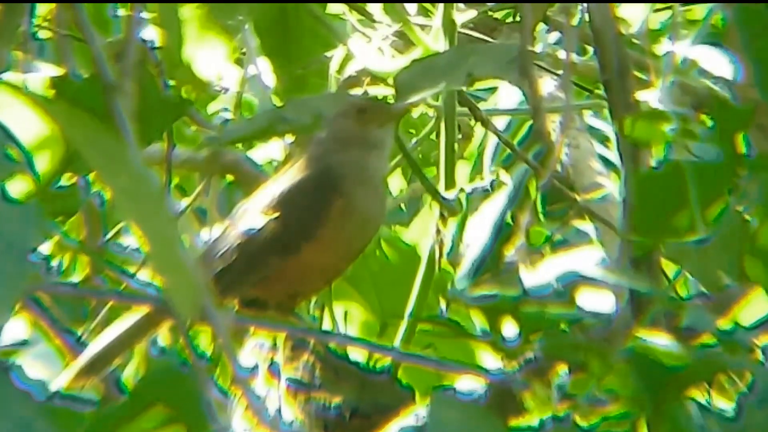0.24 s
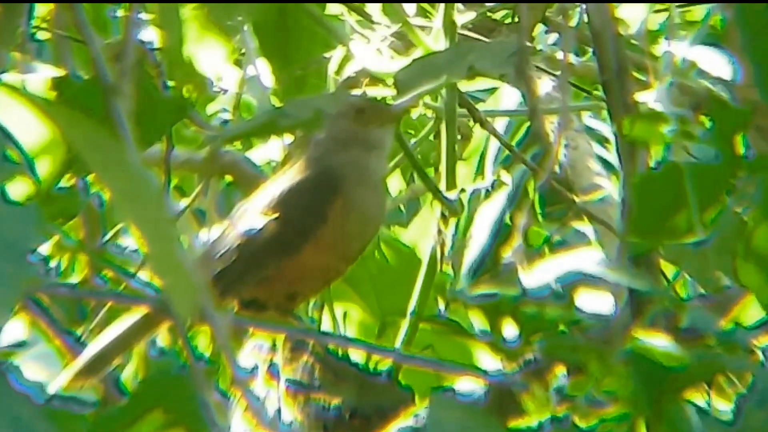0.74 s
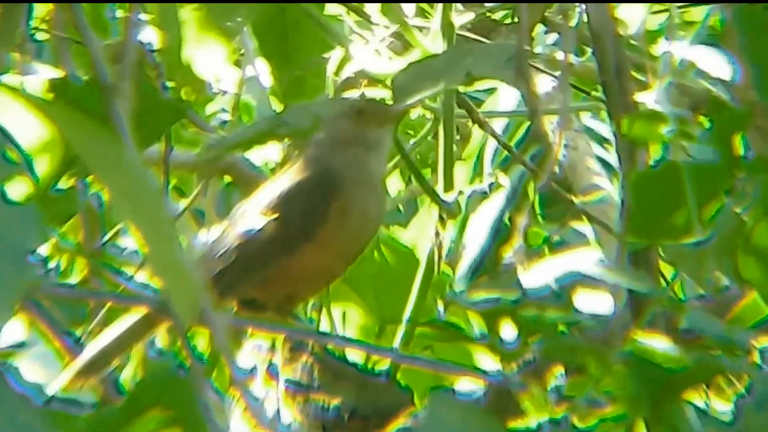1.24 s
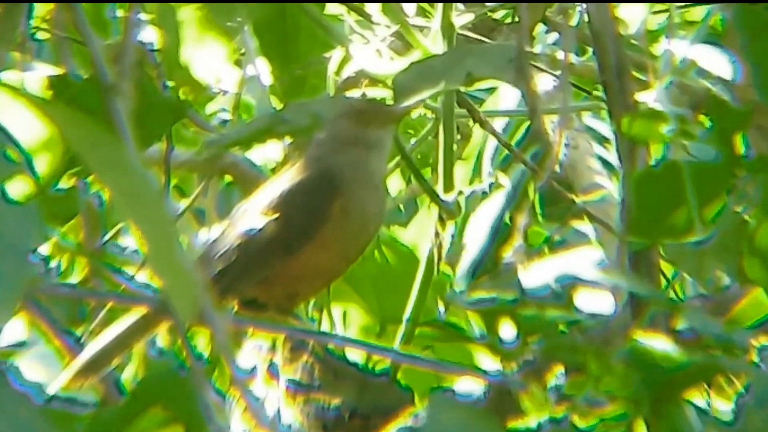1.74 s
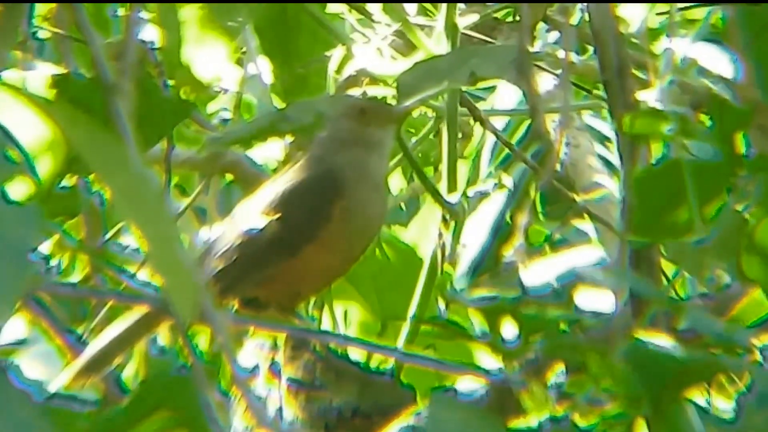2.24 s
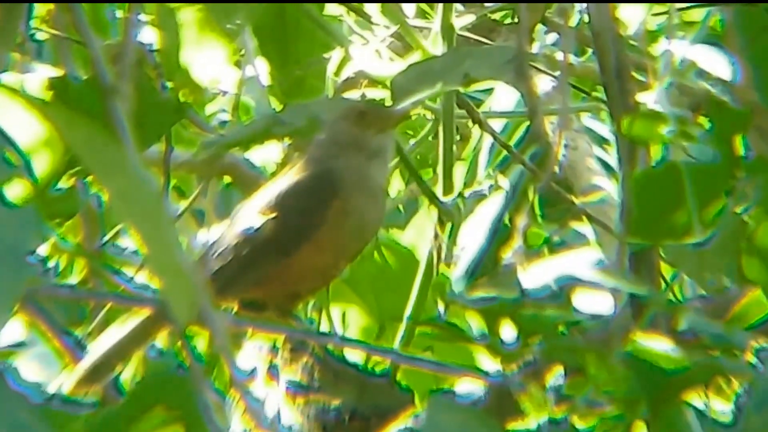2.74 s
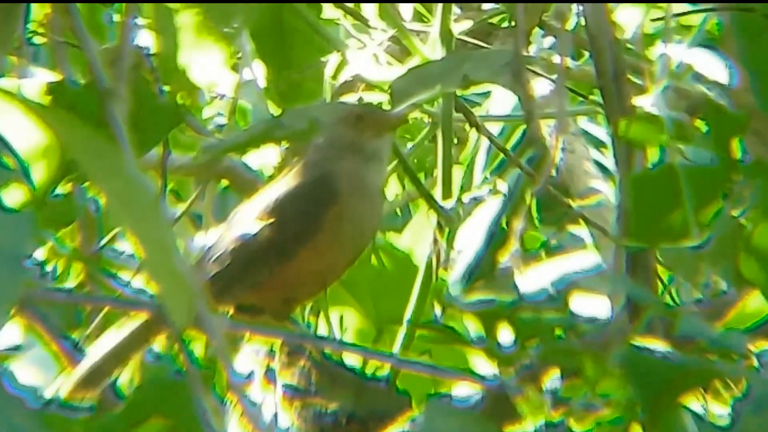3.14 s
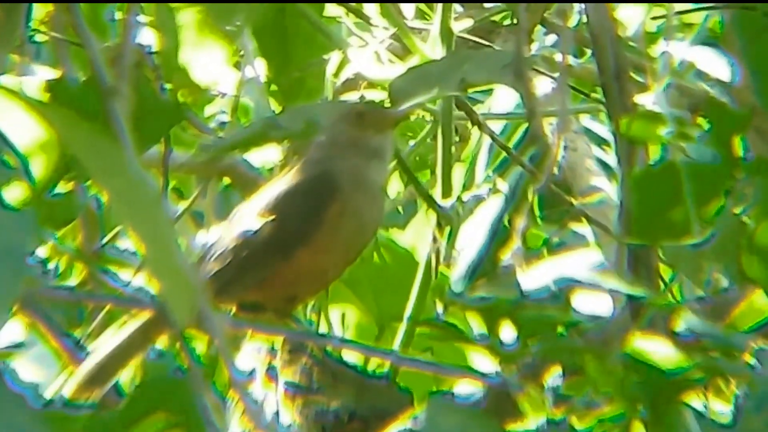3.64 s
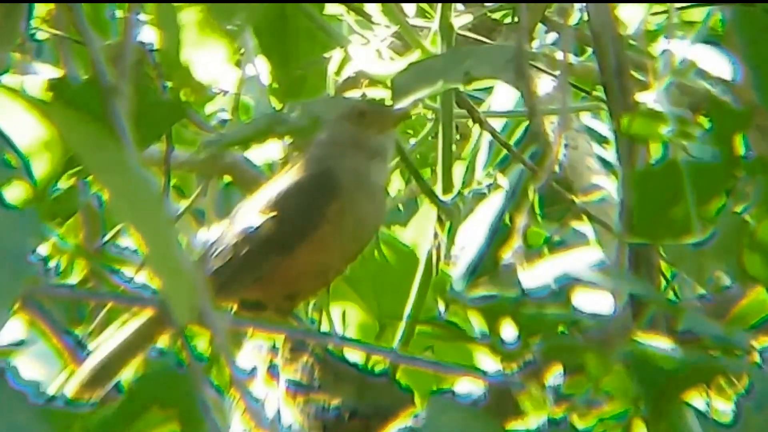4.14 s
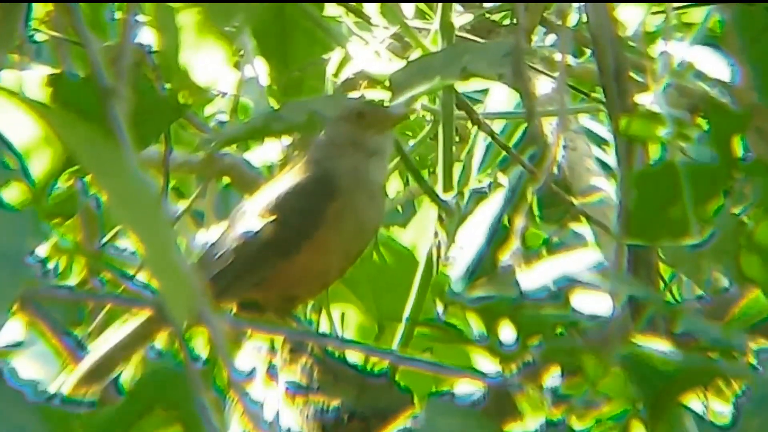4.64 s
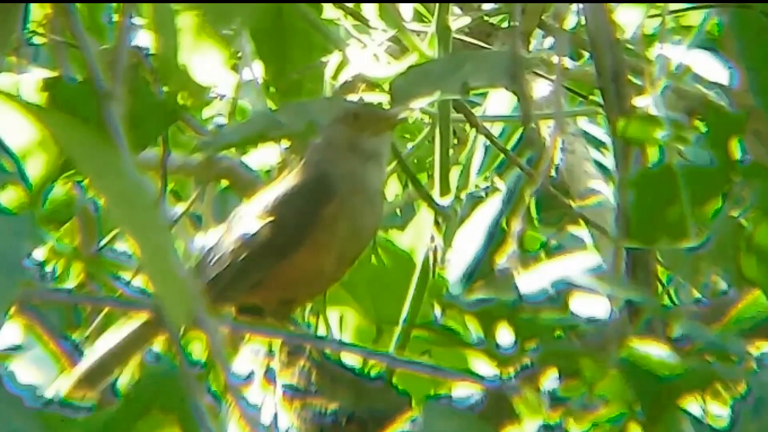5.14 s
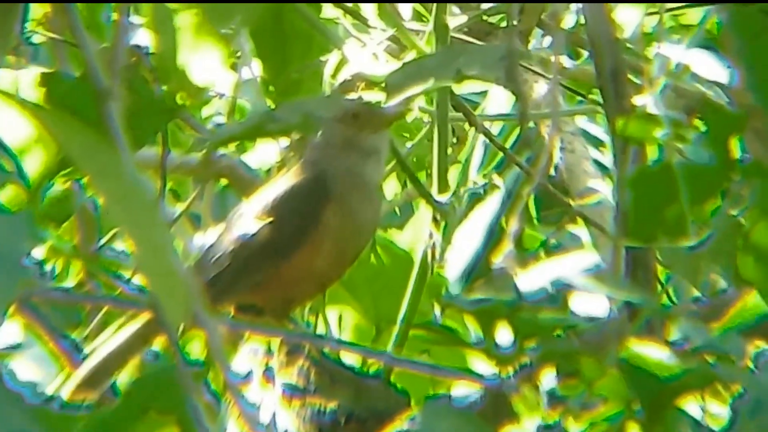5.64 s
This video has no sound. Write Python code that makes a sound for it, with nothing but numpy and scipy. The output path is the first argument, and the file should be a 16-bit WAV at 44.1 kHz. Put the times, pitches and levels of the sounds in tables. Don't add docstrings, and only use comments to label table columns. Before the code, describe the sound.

A thrush whistles two short rich phrases among leafy trees, with faint small birds, sharp twig ticks, soft breeze and low wind rumble near the end.

```python
import sys
import numpy as np
from scipy import signal
from scipy.fft import rfft, irfft, next_fast_len
from scipy.io import wavfile
from scipy.ndimage import uniform_filter1d

SR = 44100
rng = np.random.default_rng(int(sys.argv[2]) if len(sys.argv) > 2 else 0)


def convert_level_to_amplitude(level_db):
    exponent = np.asarray(level_db, float) / 20
    return 10 ** exponent


def generate_wav(sig):
    pcm = np.round(np.clip(np.atleast_2d(sig).T, -1, 1) * 32767).astype(np.int16)
    wavfile.write(sys.argv[1], SR, pcm)


N = 259294


def level(x, db):
    return x * convert_level_to_amplitude(db) / np.sqrt(np.mean(x ** 2))


def curve(rows):
    return np.interp(np.arange(N) / SR, *np.transpose(rows))


def coloured(spectrum, size=N):
    hz, db = np.transpose(spectrum)
    f = np.fft.rfftfreq(size, 1 / SR) + 1
    gain = convert_level_to_amplitude(np.interp(np.log(f), np.log(hz), db, left=-80))
    return level(irfft(rfft(rng.standard_normal(size)) * gain, size), 0)


def add(out, start_s, sound):
    i = int(start_s * SR)
    out[i:i + len(sound)] += sound[:len(out) - i]


def walk(rate_hz):
    k = int(SR / rate_hz)
    held = np.repeat(rng.standard_normal(N // k + 1), k)
    return 1.3 * uniform_filter1d(uniform_filter1d(held, k), k)[:N]


def glide(u, from_hz, to_hz, ease):
    return from_hz + (to_hz - from_hz) * (1 - np.exp(-ease * u)) / (1 - np.exp(-ease))


def swoop(u, from_hz, to_hz, hold):
    return from_hz + (to_hz - from_hz) * (1 - np.cos(np.pi * u ** hold)) / 2


def arch(u, peak, start_db, end_db):
    return np.interp(u, [0, peak, 1], [start_db, 0, end_db])


def course(u, start_s, length_s, hz, db):
    return np.c_[start_s + length_s * u, hz, db]


U = np.linspace(0, 1, 61)

# share of length, pitch over lowest, effort in dB.
SCOOP_SHAPE = [(0, 1.8, -28.5), (.03, 1.37, -10.5), (.15, 1.2, -7), (.31, 1.03, -3), (.43, 1.0, -15.5),
               (.56, 1.04, -1), (.73, 1.08, -2.5), (0.958, 1.19, -1), (1, 1.162, -21)]
# share of length, pitch over top, effort in dB.
HOOK_SHAPE = [(0, .83, -11), (.14, .94, -11), (.28, 0.98, -3), (.85, .975, -2), (1, 0.893, -18)]
# share of length, pitch over shelf, effort in dB.
SLIDE_SHAPE = [(0, 1.31, -44), (.11, 1.13, -4), (.21, 1.01, -9.5), (0.331, .995, -1), (0.571, .955, 1),
               (.92, .9, -3.5), (1, 0.78, -36.5)]
# start in s, length in s, pitch in Hz, level in dB, reach of second half (1 = as shape).
SCOOPS = [(2.756, .375, 1793, -24.5, 1.2), (4.91, .36, 1790, -24.5, .85)]
HOOKS = [(2.49, 0.13, 2430, -28, 1.274), (4.627, 0.1228, 2390, -23, 0.77)]
SLIDES = [(3.268, .247, 2489, -25, 1.01)]


def shaped_notes():
    notes, second_half_at = [], 0.43
    stock = (("scoop", SCOOP_SHAPE, SCOOPS), ("hook", HOOK_SHAPE, HOOKS), ("slide", SLIDE_SHAPE, SLIDES))
    for kind, shape, rows in stock:
        share, ratio, effort_db = np.transpose(shape)
        for s, length, hz, db, reach in rows:
            pitch = hz * np.interp(U, share, ratio) ** np.where(U > second_half_at, reach, 1)
            notes.append((kind, course(U, s, length, pitch, db + np.interp(U, share, effort_db))))
    return notes


# start in s, length in s, from Hz, to Hz, level in dB.
HELD = [(3.725, 0.1016, 1590, 1733, -27.5), (3.837, 0.106, 1917, 1821, -27), (4.149, .2, 1728, 1965, -25.5),
        (5.603, 0.09, 1913, 1799, -29.5)]


def held_notes():
    notes, attack_s, release_s = [], 0.0068, 0.006
    for s, length, a, b, db in HELD:
        corners_s = [0, attack_s, length - release_s, length]
        effort_db = np.interp(U * length, corners_s, [-50, -8.5, 0, -19])
        notes.append(("held", course(U, s, length, glide(U, a, b, ease=2.43), db + effort_db)))
    return notes


# start in s, length in s, from Hz, to Hz, level in dB.
CHIPS = [(2.688, 0.07, 2505, 2700, -52), (5.681, 0.051, 1903, 2274, -27.5)]
# start in s, length in s, from Hz, to Hz, level in dB.
GRACES = [(2.451, .032, 2500, 2273, -45), (4.593, .03, 2930, 1940, -35.5)]


def chips_and_graces():
    notes = []
    for s, length, a, b, db in CHIPS:
        notes.append(("chip", course(U, s, length, glide(U, a, b, ease=4.86), db + arch(U, .2, -11, -22.5))))
    for s, length, a, b, db in GRACES:
        hz = swoop(U, a, b, hold=1.086)
        notes.append(("chip", course(U, s, length, hz, db + arch(U, 0.465, -16.5, -23))))
    return notes


FLICK_SHAPE = [(0, 0.03), (.2, 0.31), (.38, 1), (.62, .55), (.76, .33), (.9, 0.033), (1, 0.024)]
# start in s, length in s, foot in Hz, top in Hz, level in dB.
FLICKS = [(3.823, .026, 1780, 2987, -40.5), (4.344, .062, 1990, 4060, -30)]


def flicks():
    notes, knee_hz, db_per_khz, end_db = [], 2720, -20.5, -14
    for s, length, foot, top, db in FLICKS:
        hz = foot + (top - foot) * np.interp(U, *np.transpose(FLICK_SHAPE))
        thinning_db = db_per_khz * np.maximum(hz - knee_hz, 0) / 1000
        notes.append(("flick", course(U, s, length, hz, db + thinning_db + end_db * U ** 10)))
    return notes


# start in s, length in s, centre in Hz, swing in Hz, level in dB.
WARBLES = [(5.529, 0.1018, 2660, 181.3, -33)]


def warbles():
    notes, rate_hz, high_db = [], 29.29, -10.5
    for s, length, hz, swing, db in WARBLES:
        turn = np.cos(2 * np.pi * rate_hz * (length * U - .01))
        effort_db = high_db * (1 + turn) / 2 + arch(U, 0.642, -3, -41)
        notes.append(("warble", course(U, s, length, hz + swing * turn, db + effort_db)))
    return notes


# time in s, pitch in Hz, level in dB.
LEFTOVER = [(0, 2120, -33.5), (.03, 2156, -59), (.1, 2150, -66), (.2, 2200, -72)]
MANNER = {"scoop": (10.4, -2.3), "hook": (5.7, -1), "slide": (11.7, -2), "held": (43, -13.5),
          "chip": (75, -22.5), "leftover": (92.6, -20), "flick": (69, -19), "warble": (40.2, -15)}


def song():
    notes = [("leftover", LEFTOVER)] + shaped_notes() + held_notes() + chips_and_graces() + flicks() + warbles()
    return [note for _, note in notes], [MANNER[kind] for kind, _ in notes]


# multiple of the whistle, level under it in dB.
OVERTONES = [(2, -32), (3, -45), (5, -37), (6, -41), (7, -49)]


def whistle(notes, manner, wobble):
    trill_hz, air_db = 76, -30
    out, tremor = np.zeros(N), 1 + wobble * walk(120)
    air = 1 + convert_level_to_amplitude(air_db) * coloured([(20, -28), (300, 12.5), (450, -19.0)])
    flutter = 2 * np.pi * np.cumsum(trill_hz * (1 + .15 * walk(40))) / SR
    for note, (depth_hz, bright_db) in zip(notes, manner):
        s, hz, db = np.transpose(note)
        t = np.arange(s[0], min(s[-1], (N - 1) / SR), 1 / SR)
        span = slice(int(s[0] * SR), int(s[0] * SR) + len(t))
        smooth = max(min(len(t) // 8, 90), 1)
        db = uniform_filter1d(np.interp(t, s, db), smooth)
        hz = uniform_filter1d(np.interp(t, s, hz), smooth) * tremor[span]
        phase = 2 * np.pi * np.cumsum(hz + depth_hz * np.sin(flutter[span])) / SR
        overtones = sum(convert_level_to_amplitude(d) * np.sin(int(k) * phase) for k, d in OVERTONES)
        throat_db = np.maximum(-8 * ((hz - 1980) / 260) ** 2, -14)
        tone = np.sin(phase) + convert_level_to_amplitude(bright_db + throat_db + .5 * (db + 30)) * overtones
        add(out, s[0], np.sqrt(2) * convert_level_to_amplitude(db) * tone * signal.windows.tukey(len(t), .04))
    return out * air


def scatter_tail(t, t60_s):
    return rng.standard_normal(len(t)) * convert_level_to_amplitude(-60 * t / t60_s) * np.sqrt(2 * np.log(1000) / t60_s / SR)


# delay in s, level in dB.
TRUNK_ECHOES = [(.019, -6.5), (.032, -19.5), (.05, -18.5)]


def among_trees(x, direct_db, leaves_db):
    t = np.arange(int(.9 * SR)) / SR
    leaves = convert_level_to_amplitude(leaves_db) * scatter_tail(t, t60_s=0.23) * np.minimum(t / 0.002, 1)
    path = leaves + convert_level_to_amplitude(-13.5) * scatter_tail(t, t60_s=0.57)
    path[0] += convert_level_to_amplitude(direct_db)
    for delay_s, db in TRUNK_ECHOES:
        path[int(delay_s * SR)] += convert_level_to_amplitude(direct_db + db)
    size = next_fast_len(N + len(t))
    gain = rfft(path, size)
    gain /= np.sqrt(uniform_filter1d(np.abs(gain) ** 2, size=600))
    return irfft(rfft(x, size) * gain, size)[:N]


# time in s, width in s, gain in dB.
FADES = [(2.572, .008, -4.5), (2.59, .006, 1.5), (2.921, 0.0125, -7), (2.965, .015, 6.5),
         (3.025, 0.0156, -5.5), (3.078, .007, -2), (3.092, 0.0027, 7.5), (3.115, 0.0065, 3),
         (3.371, 0.0059, -11.5), (3.495, 0.0028, 7.5), (3.755, 0.0066, 3.5), (3.815, 0.0092, -3.5),
         (3.923, 0.0057, -18), (3.938, 0.0072, 5), (4.05, 0.091, -3), (4.297, .004, 7.5),
         (4.39, 0.0047, 5.5), (4.68, 0.0046, -7), (4.719, 0.0089, -3.5), (4.83, 0.045, -6.5),
         (5.09, 0.0081, 10), (5.112, 0.0054, -16.5), (5.171, 0.00964, -13.5), (5.208, 0.0056, -16),
         (5.235, 0.007, -3), (5.265, 0.013, 8), (5.282, 0.0039, -15), (5.59, 0.0028, 4), (5.645, .01, -5.5),
         (5.68, 0.0057, 4.5)]


def faded(x):
    t = np.arange(N) / SR
    low = signal.sosfiltfilt(signal.butter(6, 3300, fs=SR, output="sos"), x)
    fade_db = sum(db * np.exp(-((t - s) / width) ** 2) for s, width, db in FADES)
    return x - low + low * convert_level_to_amplitude(fade_db)


def thrush():
    return faded(among_trees(whistle(*song(), wobble=0.0022), direct_db=0.5, leaves_db=2.5))


# start in s, length in s, from Hz, to Hz, level in dB.
FAR_RISES = [(0.276, .06, 4730, 5750, -68.5), (.94, 0.051, 4700, 5930, -68.5),
             (1.89, 0.178, 5034, 5980, -62.5), (2.245, .16, 4900, 5360, -64),
             (2.457, 0.27, 5180, 5300, -63.5), (2.679, 0.272, 3638, 4065, -62),
             (2.698, 0.16, 4817, 5210, -63), (2.811, 0.24, 4400, 4450, -68.5),
             (3.53, 0.169, 4800, 5150, -67), (3.92, 0.091, 2680, 4706, -61),
             (5.348, 0.059, 3328, 4200, -54), (4.797, .03, 2953, 3257, -60.5),
             (4.85, 0.056, 2570, 2630, -56)]
FAR_FALLS = [(0.753, .1, 3790, 3545, -55.5), (.8, 0.044, 4200, 4050, -68),
             (0.802, 0.028, 2620, 2530, -56.5), (1.66, .05, 4162, 3440, -55),
             (1.7, 0.029, 2640, 2473, -58.5), (1.862, .04, 5540, 4845, -60.5),
             (2.651, .05, 3950, 3700, -57.5), (2.839, 0.163, 5770, 5640, -81),
             (3.73, .03, 2150, 2050, -53.5), (4.461, .08, 5480, 4680, -65), (4.629, 0.082, 5580, 4560, -64),
             (4.745, .05, 8300, 4800, -60.5), (4.815, 0.0683, 3820, 3678, -56),
             (5.37, 0.14, 3200, 2700, -65.5), (5.732, 0.13, 5470, 5450, -61)]
FAR_DIVES = [(3.09, .38, 7400, 4590, -62), (4.235, .03, 7800, 6200, -59.5), (5.353, .045, 6776, 4660, -52),
             (5.779, .085, 6140, 3875, -55.5)]
# start in s, length in s, centre in Hz, swing in Hz, level in dB.
FAR_WARBLES = [(3.65, 0.3, 4068, 400, -70.5), (5.427, 0.054, 3900, 137.4, -54.5)]


def far_birds():
    u, calls = np.linspace(0, 1, 41), []
    rise_db, dive_db = arch(u, 0.39, -1.5, -8.5), arch(u, 0.55, -10.5, -0.5)
    effort_db = arch(u, 0.341, 5, -10)
    for rows, shape_db in ((FAR_RISES, rise_db), (FAR_FALLS, effort_db)):
        for s, length, a, b, db in rows:
            calls.append(course(u, s, length, glide(u, a, b, ease=2.0), db + shape_db))
    for s, length, hz, swing, db in FAR_WARBLES:
        pitch = hz + swing * np.cos(2 * np.pi * 21.62 * length * u)
        calls.append(course(u, s, length, pitch, db + effort_db))
    for s, length, a, b, db in FAR_DIVES:
        calls.append(course(u, s, length, swoop(u, a, b, hold=1.5), db + dive_db))
    voices = whistle(calls, [(80, -27)] * len(calls), wobble=.016)
    return among_trees(voices, direct_db=-25, leaves_db=-4)


# start in s, peak in dB, centre in Hz, rustle after it in dB.
TICKS = [(1.7965, -44.5, 6000, -14), (1.8621, -36, 5950, -15), (1.915, -34.5, 5970, -21),
         (5.159, -30, 5300, -20), (5.209, -17, 5530, -25.5), (5.2616, -25.5, 6130, -22),
         (5.6873, -22, 5420, -26)]
# start in s, length in s, level in dB.
RUSTLES = [(1.363, 0.052, -61), (1.821, 0.104, -63), (2.115, .006, -57), (2.124, 0.0069, -54),
           (2.137, 0.0089, -56), (2.159, .006, -55), (3.789, .01, -53.5), (3.798, 0.074, -58),
           (4.358, 0.086, -57.5)]


def twigs():
    out, t = np.zeros(N), np.arange(int(.2 * SR)) / SR
    tick_s = .0016
    for s, db, hz, rustle_db in TICKS:
        turn = 2 * np.pi * hz * (t - tick_s)
        tick = -(np.cos(turn) + 0.516 * np.sin(2 * turn)) * np.exp(-((t - tick_s) / .00008) ** 2)
        rustle = coloured([(2500, -4.5), (4500, 3), (7500, -2), (11000, -1.0), (16000, -13.5)], size=len(t))
        grains = convert_level_to_amplitude(2.2 * np.repeat(rng.standard_normal(len(t) // 60), 60)) * (t > .0018)
        add(out, s, convert_level_to_amplitude(db) * (0.943 * tick + convert_level_to_amplitude(rustle_db - 60 * t / 0.243) * grains * rustle))
    out = signal.sosfilt(signal.butter(2, 2800, "high", fs=SR, output="sos"), out)
    for s, length, db in RUSTLES:
        puff = coloured([(6000, -16.5), (9000, 7.5), (11000, 8), (14500, 1), (16000, -9)], size=len(t))
        add(out, s, convert_level_to_amplitude(db) * puff * np.minimum(t / 0.0025, 1) * np.exp(-(t / length) ** 2))
    return out


# frequency in Hz, level in dB per Hz.
LEAF_HISS = [(1500, -41.5), (4000, -9), (7500, -20.5), (10000, -1), (13000, 0.5), (16000, -8)]
# time in s, level in dB.
BREEZE = [(0.0, -65.5), (1.28, -64.5), (1.77, -67.5), (1.98, -63.5), (2.54, -64), (3.1, -61.5), (3.45, -63),
          (3.96, -60.5), (4.67, -62), (5.16, -60), (5.88, -61.5)]


def breeze():
    return coloured(LEAF_HISS) * convert_level_to_amplitude(2 * (curve(BREEZE) + 63) - 65.5 + .5 * walk(7.6))


# time in s, level in dB.
GUST = [(0, -77), (1.2, -56.5), (2.5, -64), (4.6, -87), (5.2, -59.5), (5.6, -58), (5.88, -78)]
# centre in s, frequency in Hz, peak in dB.
THUMPS = [(0.301, 121.1, -42), (5.726, 61.5, -41), (5.753, 49.6, -38.5), (5.84, 50, -46.5)]


def gusts():
    buffet = coloured([(12, -12), (22, -6), (45, 3), (65, 18.5), (100, -24)]) * convert_level_to_amplitude(curve(GUST) - 3.0)
    t = np.arange(-.05, .05, 1 / SR)
    for s, hz, db in THUMPS:
        add(buffet, s + t[0], -convert_level_to_amplitude(db) * np.cos(2 * np.pi * hz * t) * np.exp(-(t * hz / 1.07) ** 2))
    return buffet


# frequency in Hz, level in dB per Hz.
TOWN = [(20, -39.5), (40, -2.5), (114, -0.5), (311, -15.5), (487, -15.5), (538, -16.5), (727, -18),
        (1010, -19), (1170, -20), (2410, -21), (6720, -31.5), (12900, -31), (15700, -29)]


def town_hum():
    return convert_level_to_amplitude(-55 + 0.083 * walk(3.8)) * coloured(TOWN)


def scene():
    return np.tile(thrush() + far_birds() + twigs() + breeze() + gusts() + town_hum(), (2, 1))


# frequency in Hz, level in dB per Hz.
MIC_HISS = [(59, -51), (100, -19), (132, -26), (189, -8.5), (431, -5.5), (830, -8.5), (1350, -9),
            (5460, -2), (15700, -1)]


def microphone_hiss():
    hiss = convert_level_to_amplitude(-66.5) * coloured(MIC_HISS)
    return np.array([hiss, -hiss])


def roll_off(x):
    return signal.sosfilt(signal.butter(12, 15790, fs=SR, output="sos"), x)


def record(dry):
    return roll_off(dry + microphone_hiss())


dry = scene()
out = record(dry)
generate_wav(out)
```